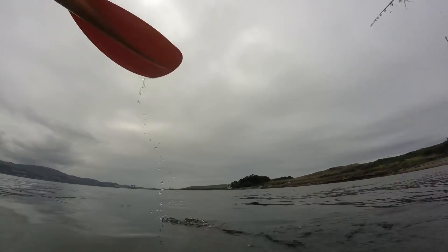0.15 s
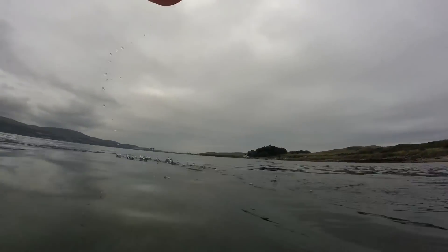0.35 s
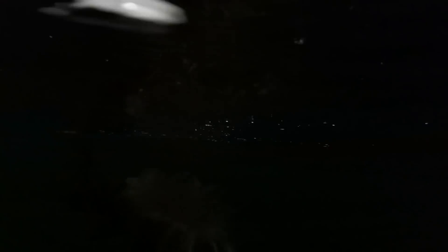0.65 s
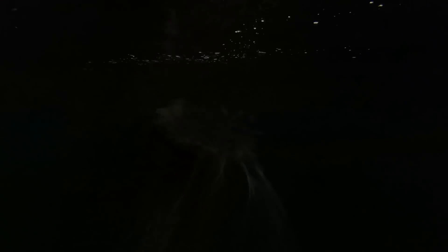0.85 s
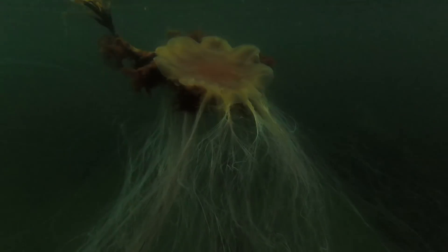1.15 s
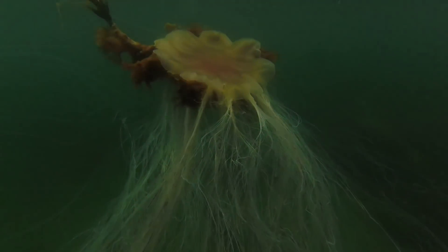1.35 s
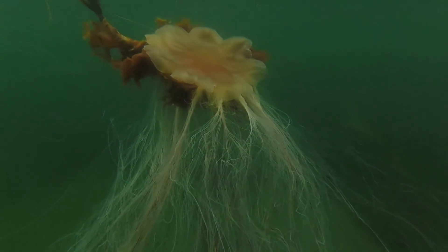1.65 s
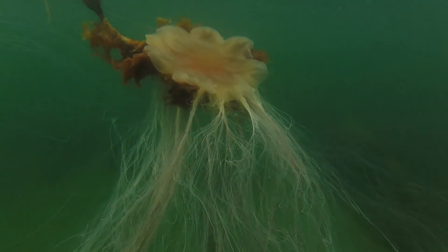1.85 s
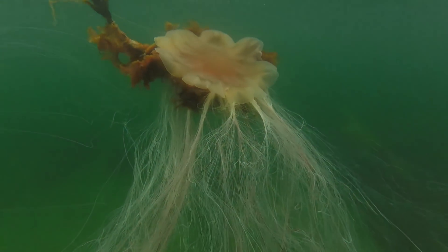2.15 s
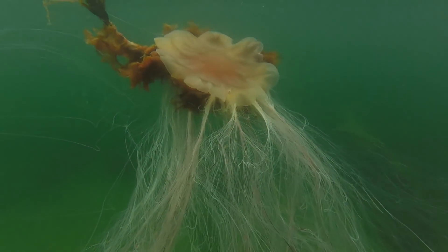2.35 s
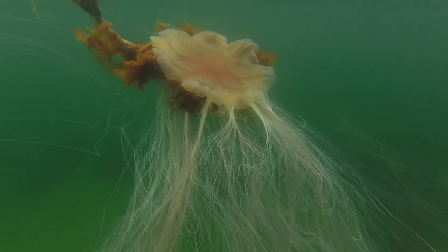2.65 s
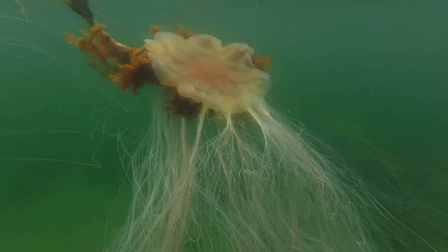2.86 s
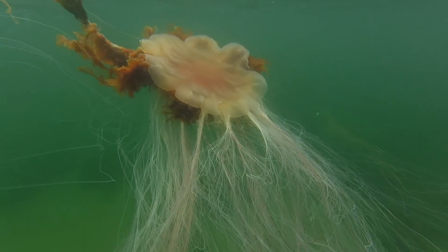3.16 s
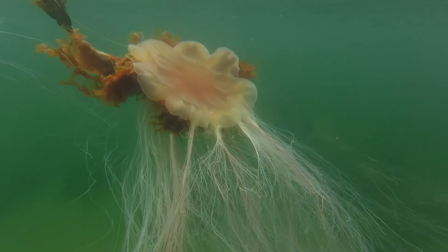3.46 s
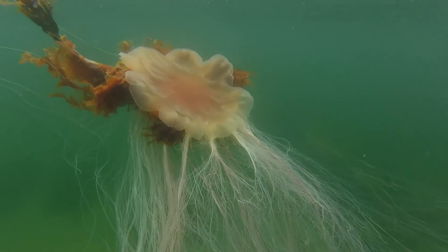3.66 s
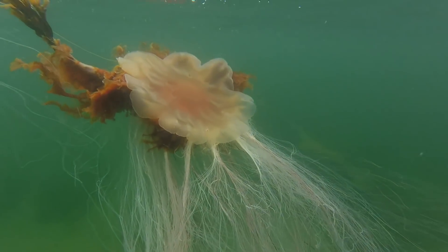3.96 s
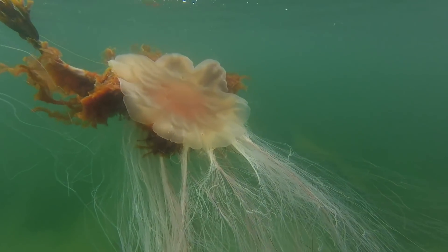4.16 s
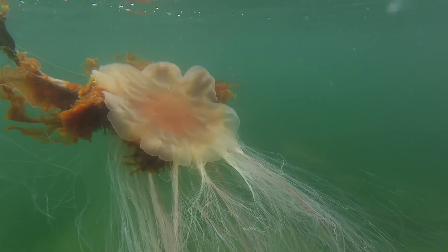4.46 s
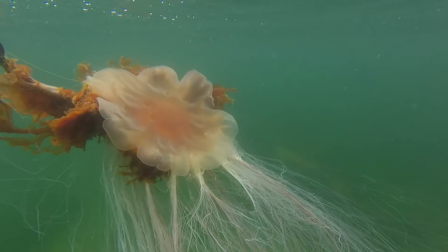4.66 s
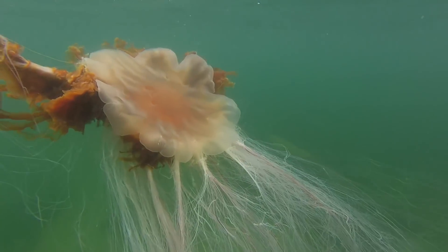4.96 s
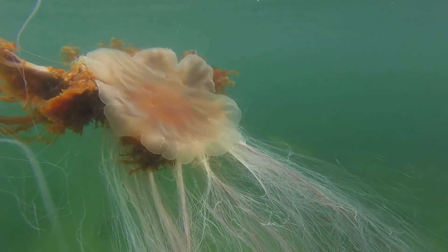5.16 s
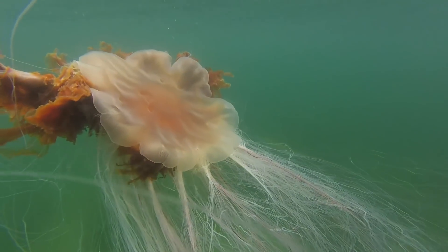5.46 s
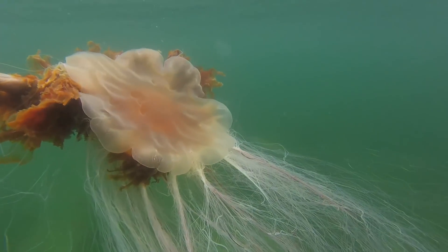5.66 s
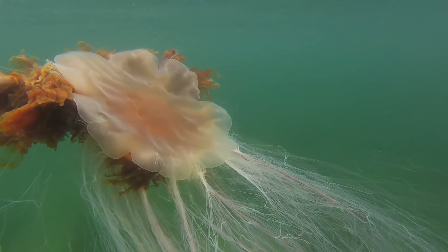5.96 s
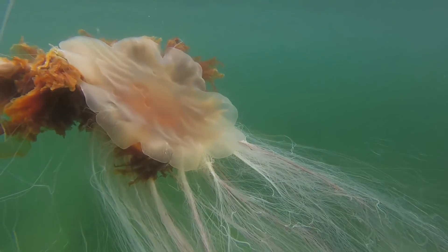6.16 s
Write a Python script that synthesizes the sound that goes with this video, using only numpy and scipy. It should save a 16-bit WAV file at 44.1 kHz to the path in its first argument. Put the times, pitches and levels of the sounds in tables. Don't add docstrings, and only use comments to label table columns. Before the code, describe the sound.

Close on a sealed plastic camera housing, hand and paddle rustle and boom hollowly for under half a second. Loud, clipped air-pocket pops, cracks and bubbles burst as it goes underwater. The surface noise cuts off, and a distant boat engine's rough, resonant roar fades up, is pushed down by one late pop, then holds steady. A hard plastic knock near four seconds briefly ducks it; faint ticks and soft bumps follow.

```python
import sys
import numpy as np
from scipy import signal
from scipy.fft import rfft, irfft
from scipy.io import wavfile
from scipy.ndimage import uniform_filter1d

SR = 44100
rng = np.random.default_rng(int(sys.argv[2]) if len(sys.argv) > 2 else 0)


def voltage_ratio(decibels):
    exponent = np.asarray(decibels, float) / 20
    return 10 ** exponent


def wav_record(signal):
    frames = np.transpose(np.atleast_2d(signal))
    bounded = np.clip(frames, -1, 1)
    quanta = np.round(bounded * 32767).astype(np.int16)
    wavfile.write(sys.argv[1], SR, quanta)


N = 278712
TIME_S = np.arange(N) / SR


def rms_one(x):
    return x / np.sqrt(np.mean(x ** 2) + 1e-20)


def in_time(rows):
    start_s, *columns = np.transpose(rows)
    return [np.interp(TIME_S, start_s, column) for column in columns]


def ramp(start_s, length_s):
    return np.clip((TIME_S - start_s) / length_s, 0, 1)


def coloured(spectrum):
    hz, level_db = np.transpose(spectrum)
    bins_hz = np.maximum(np.fft.rfftfreq(N, 1 / SR), 1)
    shape_db = np.interp(np.log(bins_hz), np.log(hz), level_db, left=-120, right=-120)
    return rms_one(irfft(rfft(rng.standard_normal(N)) * voltage_ratio(shape_db), N))


def drift(rate_hz):
    r = np.exp(-2 * np.pi * rate_hz / SR)
    wander = signal.lfilter([1], [1, -2 * r, r * r], rng.standard_normal(N + SR))
    return rms_one(wander[SR:])


def band(x, low_hz, high_hz):
    return signal.sosfilt(signal.butter(3, [low_hz, high_hz], "band", fs=SR, output="sos"), x)


def peak(x, hz, width_hz, db):
    w, g = 2 * np.pi * hz / SR, voltage_ratio(db / 2)
    a = np.pi * width_hz / SR
    above = [1 + a * g, -2 * np.cos(w), 1 - a * g]
    below = [1 + a / g, -2 * np.cos(w), 1 - a / g]
    return signal.lfilter(above, below, x)


def ring(x, hz, t60_s):
    r, w = voltage_ratio(-60 / (max(t60_s, .002) * SR)), 2 * np.pi * hz / SR
    return signal.lfilter([0, np.sin(w)], [1, -2 * r * np.cos(w), r * r], x + 1e-18)


def add(out, start_s, sound, peak_db):
    at = round(start_s * SR)
    out[at:at + len(sound)] += (voltage_ratio(peak_db) * sound / np.abs(sound).max())[:N - at]


def swells(rows, width_s):
    return sum(voltage_ratio(peak_db) * np.exp(-((TIME_S - peak_s) / width_s) ** 2) for peak_s, peak_db in rows)


# start_s [s], drop_db [dB]
DUCKS = [
    (0.859, 18.5),
    (1.159, 16),
    (3.783, 17),
]
RECOVERY_DB_PER_S = 18


def gain_control():
    lost_db = [
        np.where(TIME_S > start_s, drop_db - RECOVERY_DB_PER_S * (TIME_S - start_s), 0)
        for start_s, drop_db in DUCKS]
    deepest_db = np.maximum(np.max(lost_db, axis=0), 0)
    return voltage_ratio(-uniform_filter1d(deepest_db, size=200))


# hz [Hz], level_db [dB per Hz]
ENGINE = [(60, -11.5), (130, -7), (300, -9.5), (700, -5), (900, -17.5), (1100, -21.5), (2600, -21.5),
          (3300, -37.5), (5000, -44.5), (8000, -49.5), (10000, -54.5), (13000, -58), (15000, -60)]
# hz [Hz], width_hz [Hz], gain_db [dB]
HOUSING = [(194, 31, -9.5), (254.5, 36, 3.5), (275.7, 7.7, 4), (400.4, 68, 6.5), (448, 3.4, 2.5),
           (542, 15, 1.5), (587.3, 23, 9.5), (628, 13.3, 10), (747, 8.4, -1.5), (805, 73, 4.5),
           (1472, 43, 11.5), (1538, 59, -14.5), (1635, 57, -2), (1706, 44, -14.5), (1919, 303, 17),
           (2400, 193, 6.5), (2755, 69, -8), (3285, 215, -7), (3610, 550, 4), (7570, 940, 2),
           (2095, 80, -14), (2230, 140, -7)]
# hz [Hz], width_hz [Hz], change_db [dB]
SHALLOW = [(1405, 170, 4), (1990, 226, -9), (2500, 210, -1.5)]
ENGINE_DB, ENGINE_FROM_S = -35, 0.82
SETTLE_FROM_S, SETTLE_TO_S = 1.55, 2.53


def engine():
    deep = coloured(ENGINE) * voltage_ratio(0.72 * drift(9.7) + 0.6 * drift(0.5))
    for hz, width_hz, gain_db in HOUSING:
        deep = peak(deep, hz, width_hz, gain_db)
    deep = shallow = rms_one(deep)
    for hz, width_hz, change_db in SHALLOW:
        shallow = peak(shallow, hz, width_hz, change_db)
    depth = ramp(SETTLE_FROM_S, SETTLE_TO_S - SETTLE_FROM_S)
    roar = depth * deep + (1 - depth) * shallow
    return voltage_ratio(ENGINE_DB) * roar * ramp(ENGINE_FROM_S, 0.076)


WET_FROM_S = 0.43
PLUNGE_S = 0.878
# hz [Hz], level_db [dB per Hz]
RUMBLE_COLOUR = [(8, 0), (25, 4.5), (60, -3.5), (120, -20.5), (200, -28)]
# peak_s [s], peak_db [dB]
HEAVES = [(0, -24.5), (.09, -46), (.31, -26), (.5, -42.5), (.675, -41), (.86, -39.5), (2.11, -36),
          (2.52, -42.5), (3.78, -33), (5.67, -40.5)]
HEAVE_S, AIR_RUMBLE_DB, WATER_RUMBLE_DB = 0.024, -33, -45.5
SLOSH_DB, SLOSH_FADE_DB_PER_S = -42, 18.5


def rumble():
    wet = ramp(WET_FROM_S, .06)
    in_air = (1 - wet) * voltage_ratio(AIR_RUMBLE_DB)
    in_water = wet * voltage_ratio(WATER_RUMBLE_DB) * gain_control() ** 0.86
    slosh = ramp(PLUNGE_S, .03) * voltage_ratio(SLOSH_DB - SLOSH_FADE_DB_PER_S * (TIME_S - PLUNGE_S))
    steady = (in_air + in_water + slosh) * voltage_ratio(2.5 * drift(8))
    return (steady + swells(HEAVES, HEAVE_S)) * coloured(RUMBLE_COLOUR)


# hz [Hz], level_db [dB per Hz]
RUSTLE = [(440, -54), (750, -23.5), (802, -18.5), (898, -3), (1040, -13.5), (1330, -0.5), (1540, -6),
          (1780, 1), (2110, -14), (2420, -5.5), (3730, -25.5), (4170, -23.5), (4500, -28), (5850, -56),
          (9900, -120)]
# hz [Hz], level_db [dB per Hz]
SPRAY = [(2060, -28.5), (3500, -2), (3850, -6.5), (6650, -8), (9990, -21), (13400, -33.5), (16000, -60)]
# hz [Hz], level_db [dB per Hz]
GURGLE = [(250, -24), (330, 3), (600, -2.5), (900, -3.5), (1200, -15)]
# start_s [s], effort_db [dB]
EFFORT = [(0, -49), (.085, -35.5), (.11, -42.5), (.226, -41.5), (.28, -31), (.33, -31), (.365, -50.5),
          (.52, -41), (.58, -48.5)]
# peak_s [s], peak_db [dB]
JOLTS = [(.06, -31.5), (.13, -35.5), (.27, -26), (.41, -34.5), (.52, -34), (.63, -53), (.865, -42),
         (.9, -39.5)]
MEAN_EFFORT_DB, SPRAY_DAMPED_DB = -42, 3.5
PLUNGE_DB, PLUNGE_RISE_S = -43, 0.022
BOOM_HZ, BOOM_WIDTH_HZ, BOOM_FLOOR_DB, JOLT_RISE_S = 178, 24, -46, 0.029


def surface():
    swing_db = in_time(EFFORT)[0] - MEAN_EFFORT_DB
    wet_s = np.clip(TIME_S - WET_FROM_S, 0, 1)

    def driven(offset_db, share, loss_db_per_s):
        return voltage_ratio(offset_db + share * swing_db - loss_db_per_s * wet_s)

    plunge = swells([(PLUNGE_S, PLUNGE_DB)], PLUNGE_RISE_S)
    rustle = driven(-40.5, 0.87, 49) + 0.45 * plunge
    spray = driven(-61, .75, 24) * voltage_ratio(-SPRAY_DAMPED_DB * ramp(WET_FROM_S - .03, .03))
    gurgle = driven(-55, .4, -2.5) + plunge
    boom = ring(rng.standard_normal(N), BOOM_HZ, 3.0 / BOOM_WIDTH_HZ)
    boom = rms_one(band(boom, 110, 300)) * (voltage_ratio(BOOM_FLOOR_DB) + swells(JOLTS, JOLT_RISE_S))
    grain = voltage_ratio(2.0 * drift(60))
    wash = rustle * coloured(RUSTLE) + spray * coloured(SPRAY) + gurgle * coloured(GURGLE)
    water_closes = np.clip((.905 - TIME_S) / 0.0097, 0, 1)
    return (wash * grain + boom) * water_closes


# start_s [s], peak_db [dB], pitch_hz [Hz]
BUMPS = [(0.494, -26.5, 173), (0.599, -29, 155), (0.669, -44, 62.6), (0.698, -30.5, 61.66),
         (0.852, -28, 104), (0.884, -33, 124.6), (0.999, -42.5, 135.7), (1.154, -48, 210.4),
         (0.75, -38, 200.4), (0.781, -38, 190), (1.039, -47, 61.9), (1.109, -48, 61.9), (1.135, -44.5, 85),
         (3.197, -39, 223), (5.644, -30.5, 115), (5.87, -25.5, 76.5), (5.918, -31.5, 148)]


def bumps():
    out, t = np.zeros(N), np.arange(6000) / SR
    for start_s, peak_db, pitch_hz in BUMPS:
        add(out, start_s, np.sin(2 * np.pi * pitch_hz * t) * t * np.exp(-t / 0.007), peak_db)
    return out


# start_s [s], peak_db [dB], softness cutoff_hz [Hz], way [1 push, -1 pull]
KNOCK = [
    (3.7807, 0, 1206, 1),
    (3.782, -2.5, 3370, 1),
    (3.7827, -5, 3570, 1),
    (3.7833, -13.5, 1827, -1),
    (3.785, -11.5, 2830, -1),
]
# hz [Hz], level_db [dB], t60_s [s]
KNOCK_MODES = [(173, -32.5, 0.093), (660, -7.5, 0.034), (800, -23, .025), (1066, 0.5, 0.0075),
               (1475, -19.5, 0.018), (2160, 0.5, 0.0148), (2000, -6, 0.014), (2590, -16.5, .009),
               (3900, -7.5, 0.01)]


def knock():
    push = np.zeros(N)
    for start_s, peak_db, cutoff_hz, way in KNOCK:
        lowpass = signal.butter(2, cutoff_hz, fs=SR, output="sos")
        soft = signal.sosfilt(lowpass, np.arange(500) == 0)
        add(push, start_s, np.sign(way) * soft, peak_db + 20 * np.log10(soft.max()))
    modes = sum(voltage_ratio(level_db) * ring(push, hz, t60_s) for hz, level_db, t60_s in KNOCK_MODES)
    return voltage_ratio(-3.5) * band(modes, 85, 3600)


# start_s [s], peak_db [dB], centre_hz [Hz], length_s [s]
TICKS = [(.048, -49, 5500, .0003), (.070, -46, 5200, .0003), (.388, -25, 5300, .0006),
         (.435, -45, 6000, .0004), (.482, -46, 9000, .0004), (.633, -40, 5300, .0004),
         (.684, -34, 6100, .0005), (.7015, -26, 8000, .0004), (.738, -41, 8500, .0003),
         (.782, -6, 5500, .00035), (.9642, -56, 4190, .0004), (1.1555, -17, 6600, .0003),
         (1.162, -47, 6500, .0003), (2.146, -50, 4800, .0003), (2.4294, -57, 4500, .0003),
         (3.2495, -56, 6000, .0003), (3.449, -53, 6500, .0003), (3.7815, -35, 8500, .0004),
         (4.7253, -56, 5000, .0003), (4.996, -46, 3600, .0003), (4.9963, -48, 6000, .0003),
         (5.864, -50, 6600, .0003)]
CRACK_LEAD_S, CRACK_HZ, CRACK_SPREAD, CRACK_S = 0.00082, 6207, 0.12, 0.00036


def cracks():
    out, t = np.zeros(N), np.arange(1500) / SR
    rows = []
    for start_s, _, _, crack_db in POPS:
        centre_hz = CRACK_HZ * (1 + CRACK_SPREAD * rng.uniform(-1, 1))
        rows.append((start_s - CRACK_LEAD_S, crack_db, centre_hz, CRACK_S))
    for start_s, peak_db, centre_hz, length_s in rows + TICKS:
        burst = rng.standard_normal(1500) * t * np.exp(-t / length_s / 2)
        add(out, start_s, band(burst, .7 * centre_hz, 1.288 * centre_hz), peak_db)
    return out


FIZZ_PER_S, FIZZ_DB, FIZZ_FADE_S, FIZZ_CYCLES = 1200, -27, 0.015, 9.2


def fizz():
    swarm = np.zeros(N)
    for start_s, peak_db, *_ in POPS:
        swarm[round(start_s * SR)] = voltage_ratio(0.6 * peak_db)
    swarm = signal.lfilter([1], [1, -np.exp(-1 / (FIZZ_FADE_S * SR))], swarm)
    clicks = (rng.random(N) < FIZZ_PER_S / SR) * rng.standard_normal(N) * swarm
    clicks = band(clicks, 700, 4500)
    dealt = np.repeat(rng.integers(0, 14, size=N // 40 + 1), 40)[:N]
    out = np.zeros(N)
    for k, hz in enumerate(np.geomspace(900, 4500, 14)):
        out += ring(clicks * (dealt == k), hz, FIZZ_CYCLES / hz) * (1500 / hz) ** 0.4
    return voltage_ratio(FIZZ_DB) * out


# start_s [s], peak_db [dB], pitch_hz [Hz], crack_db [dB]
POPS = [(.39, -22, 1640, -40), (0.4, -22, 1830, -43), (0.4046, 1, 1790, -34.5), (.492, -17.5, 2400, -21.5),
        (0.4977, -9, 2500, -10), (.502, -16, 1480, -38), (0.5128, -15, 2460, -49), (.518, -16, 1560, -52),
        (0.5293, -7.5, 2820, -42), (0.5374, -5, 4150, -30), (.547, -18.5, 3950, -33),
        (.566, -31, 2070, -41), (0.591, -16.5, 1540, -49), (0.594, -17.5, 2344, -17.5),
        (.597, -1.5, 1800, -34), (.61, -22.5, 2460, -44), (.625, -6, 2710, -45), (0.641, -21.5, 2670, -28),
        (.689, -19.5, 2610, -16), (0.7, -14.5, 2180, -37), (.709, -27.5, 2730, -36),
        (.713, -28.5, 1810, -28), (.746, -21.5, 2620, -21), (0.7524, 0, 2320, -32), (.759, -21, 2260, -50),
        (0.778, -15.5, 2270, -28), (0.783, -6, 2160, -30), (0.799, -30, 2340, -41),
        (.804, -33.5, 2200, -36.5), (.686, -28.5, 2300, -42)]
# start_s [s], peak_db [dB], pitch_hz [Hz], t60_s
# [s]
BUBBLES = [(0.4055, -10.5, 1270, .0083), (.433, -27.5, 2430, .03), (.469, -22, 1480, .035),
           (0.499, -10, 4200, .012), (.52, -35.5, 652, .04), (.702, -31, 634, 0.022),
           (0.529, -20.5, 2700, .049), (.538, -11, 1634, .033), (.542, -12, 2740, .024),
           (.597, -26.5, 400, .02), (0.597, -13.5, 800, .036), (.626, -26, 944, .046),
           (.649, -38, 1190, .007), (.697, -20.5, 1200, .015), (0.73, -40, 900, .008),
           (0.768, -37.5, 2400, .015), (0.78, -11, 4034, .012), (0.782, -19, 1103, .005),
           (.813, -40, 2400, .024), (.838, -33, 640, .1), (.847, -17.5, 2350, .022),
           (.868, -40.5, 2500, .02), (1.07, -51, 2310, .041), (1.1556, -5.5, 2385, 0.011),
           (1.1558, -7.5, 1810, .016), (1.156, -24.5, 630, .033), (1.1558, -23, 3900, .014)]
# hz [Hz], level_db [dB], t60_s [s]
SHELL = [(330, -33.5, .02), (630, -27.5, 0.021), (1470, -24.5, 0.015), (1980, -9, 0.035), (2400, 1, 0.015),
         (3140, -13.5, .012), (4000, -22, 0.0054), (6100, -31, .006)]
POP_T60_S, SHELL_DB, SHELL_FOLLOWS, BUBBLE_SHELL_DB = .012, -10.5, 0.605, -8.5


def pops():
    out, t = np.zeros(N), np.arange(3000) / SR
    rows = [(start_s, peak_db, pitch_hz, POP_T60_S, SHELL_DB + SHELL_FOLLOWS * peak_db)
            for start_s, peak_db, pitch_hz, _ in POPS]
    rows += [(*bubble, BUBBLE_SHELL_DB + bubble[1]) for bubble in BUBBLES]
    for start_s, peak_db, pitch_hz, t60_s, shell_db in rows:
        noise = rng.standard_normal(3000)
        wobble = 1 + 2.0 * band(noise, 89, 0.3 * pitch_hz)
        swell = (1 - np.exp(-t * pitch_hz / 1.6)) * voltage_ratio(-60 * t / t60_s)
        tone = np.sin(2 * np.pi * pitch_hz * (0.979 * t + 1.0 * t ** 2))
        add(out, start_s, tone * swell * wobble, peak_db)
        burst = band(noise * t * np.exp(-t / 0.00036), 0.16 * pitch_hz, 2.7 * pitch_hz)
        shell = sum(voltage_ratio(level_db) * ring(burst, hz, mode_t60_s) for hz, level_db, mode_t60_s in SHELL)
        add(out, start_s, shell, shell_db)
    return out


def scene():
    below = engine() * gain_control() + rumble()
    contacts = bumps() + knock()
    water = cracks() + fizz() + pops()
    return (below + surface() + contacts + water)[None]


def band_limit(x):
    return signal.sosfilt(signal.butter(12, 16500, fs=SR, output="sos"), x)


def record(dry):
    mix = np.clip(dry, -.99, .99)
    return band_limit(mix)


dry = scene()
out = record(dry)
wav_record(out)
```